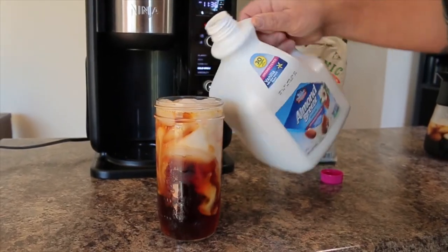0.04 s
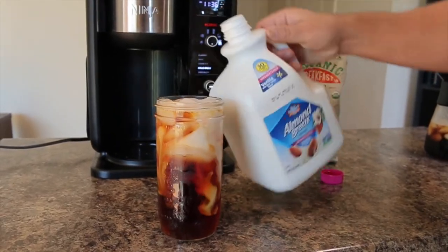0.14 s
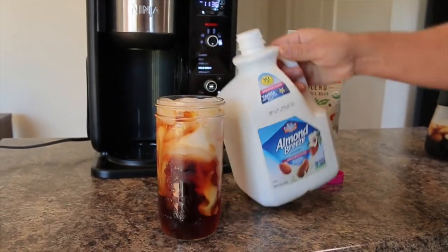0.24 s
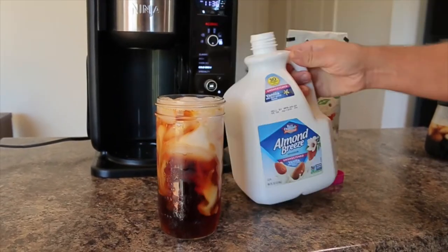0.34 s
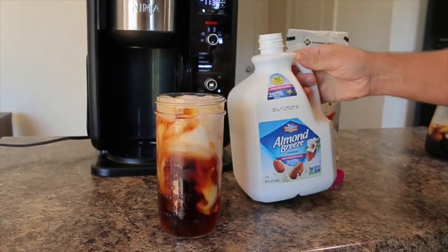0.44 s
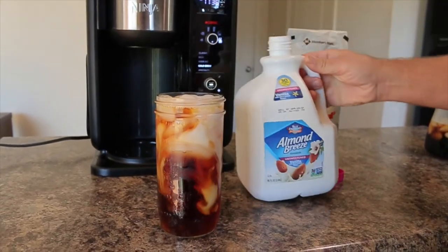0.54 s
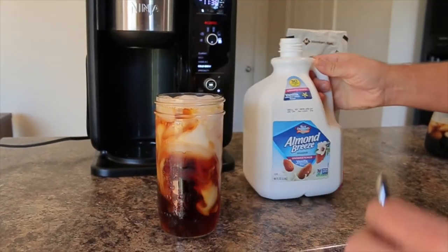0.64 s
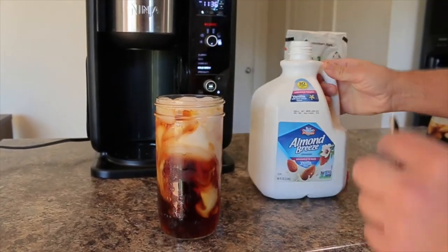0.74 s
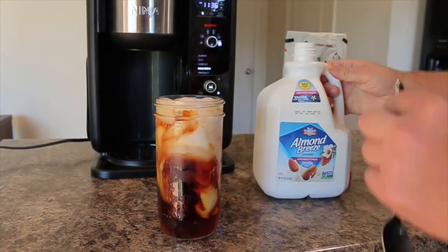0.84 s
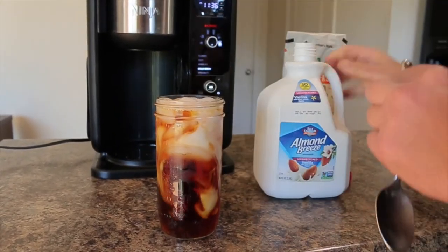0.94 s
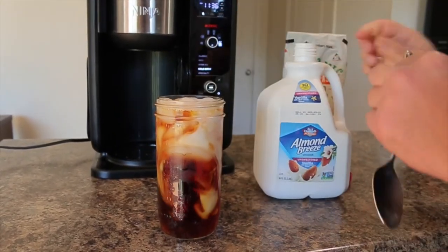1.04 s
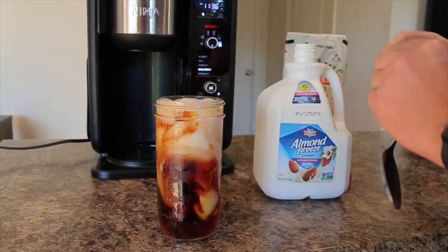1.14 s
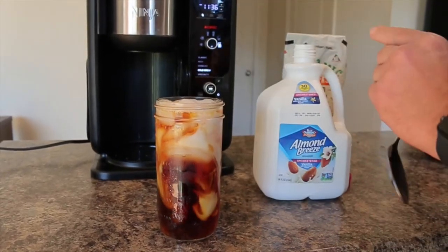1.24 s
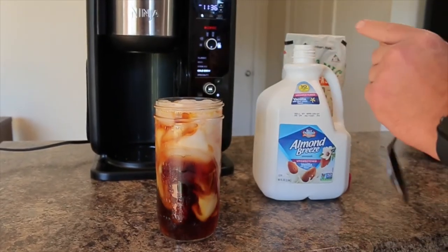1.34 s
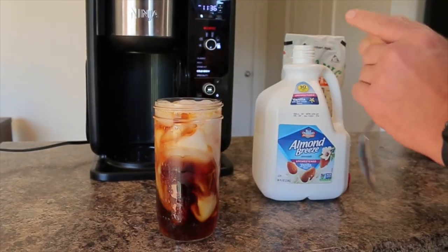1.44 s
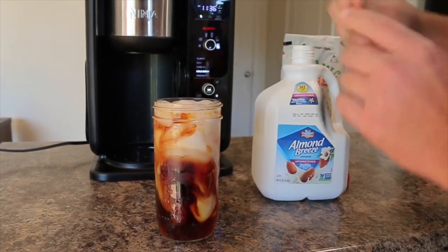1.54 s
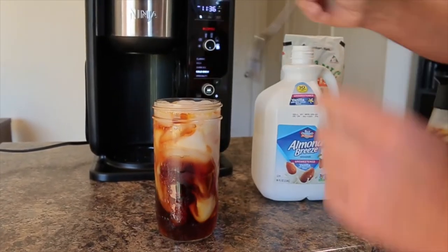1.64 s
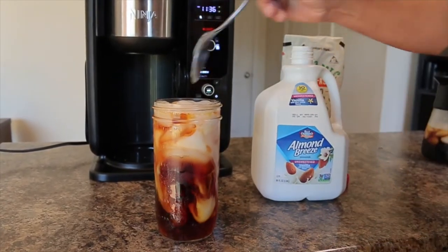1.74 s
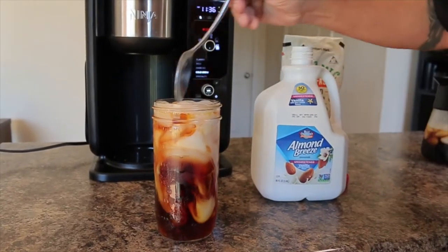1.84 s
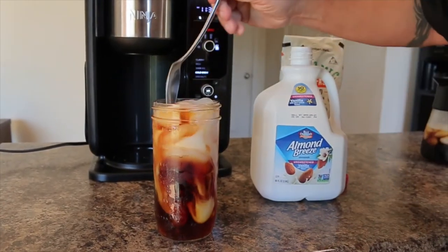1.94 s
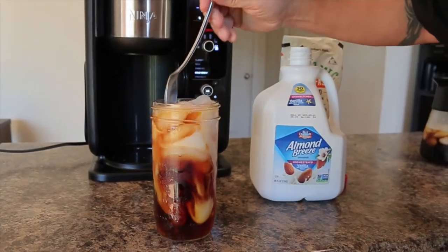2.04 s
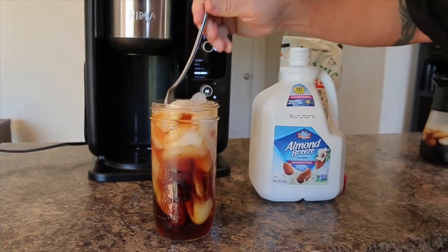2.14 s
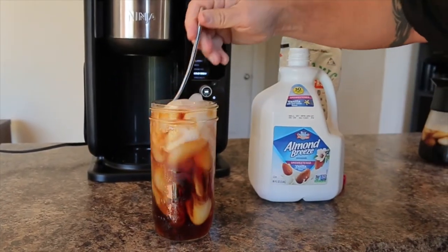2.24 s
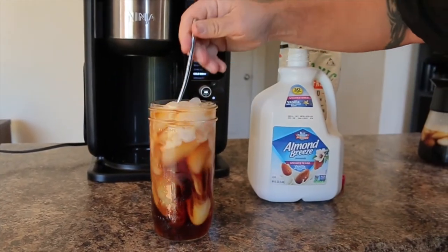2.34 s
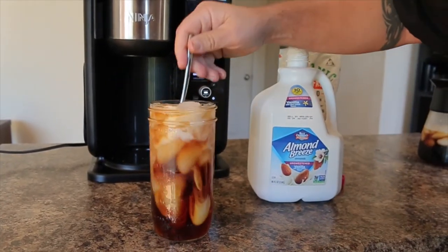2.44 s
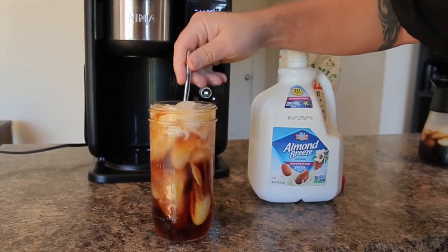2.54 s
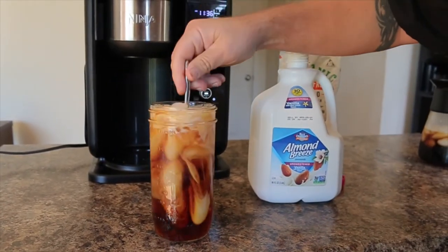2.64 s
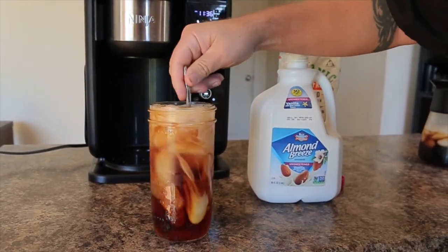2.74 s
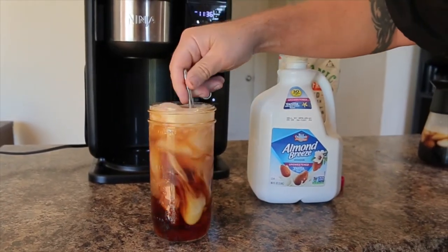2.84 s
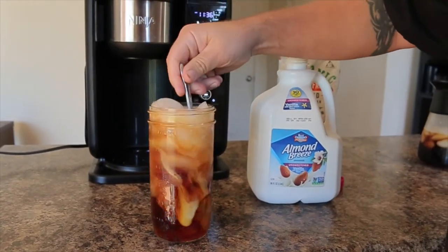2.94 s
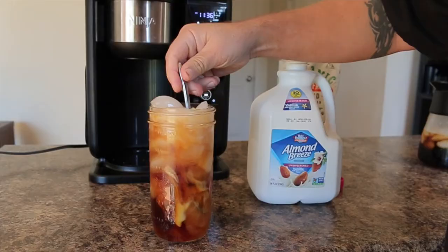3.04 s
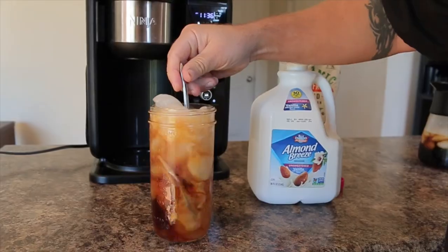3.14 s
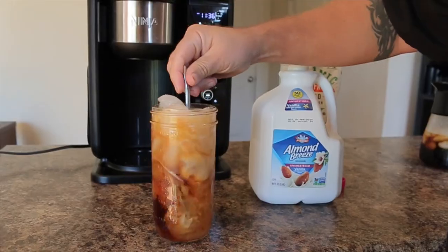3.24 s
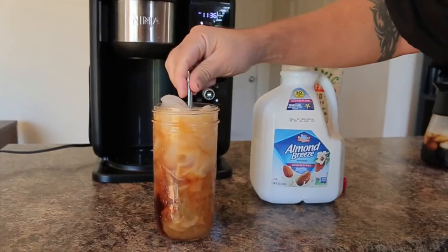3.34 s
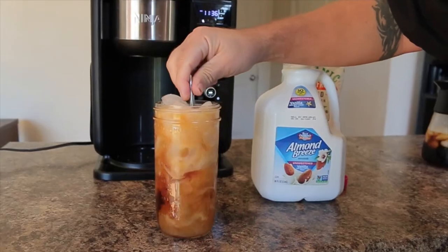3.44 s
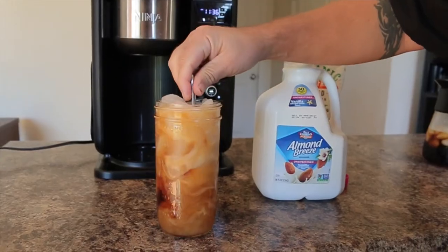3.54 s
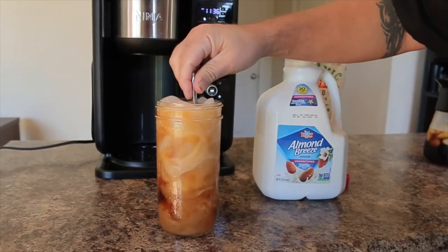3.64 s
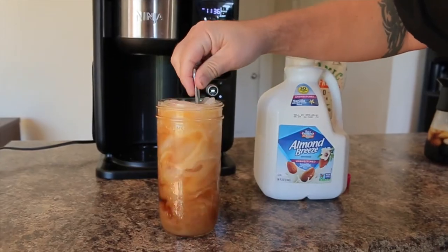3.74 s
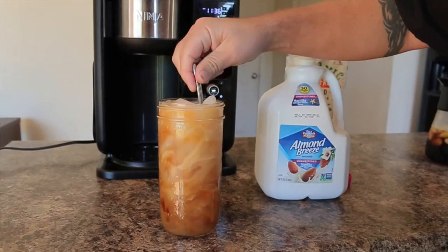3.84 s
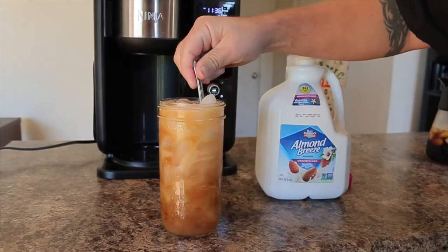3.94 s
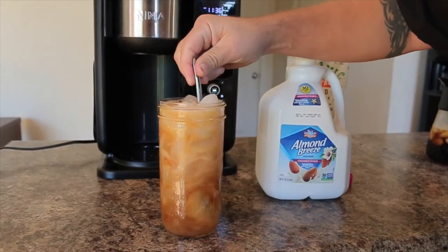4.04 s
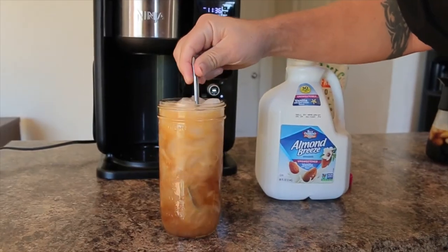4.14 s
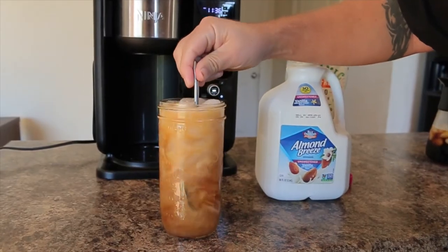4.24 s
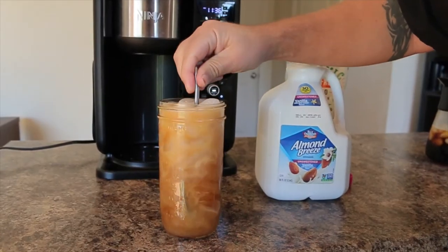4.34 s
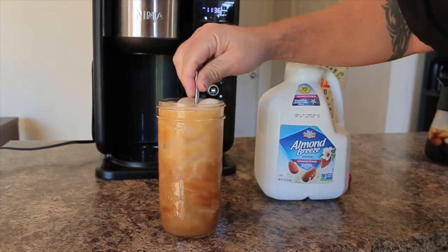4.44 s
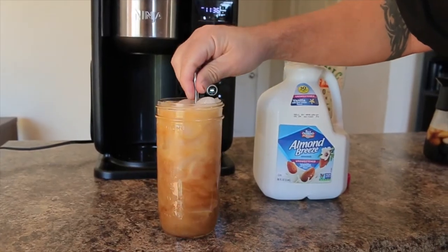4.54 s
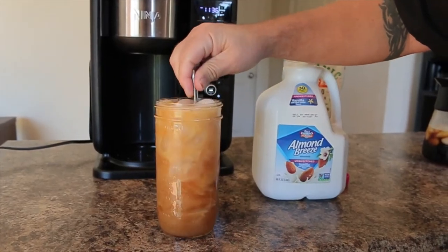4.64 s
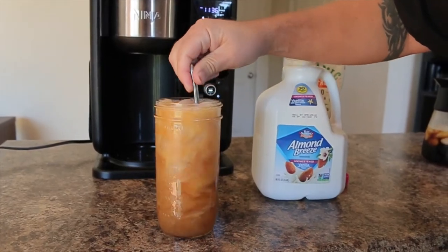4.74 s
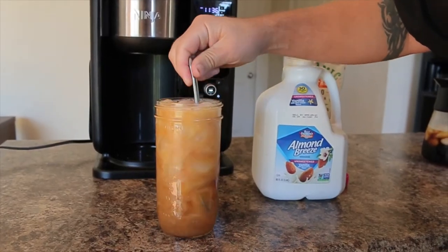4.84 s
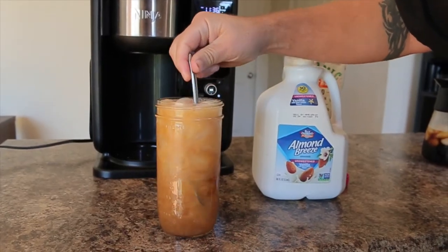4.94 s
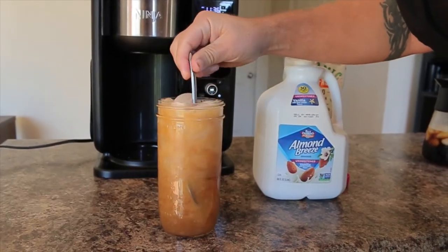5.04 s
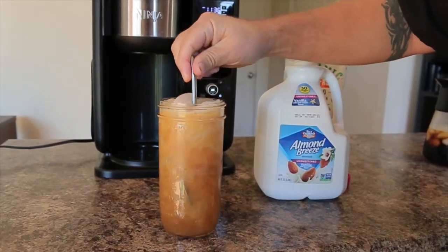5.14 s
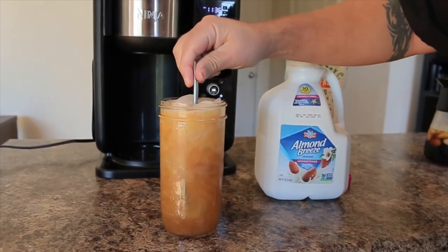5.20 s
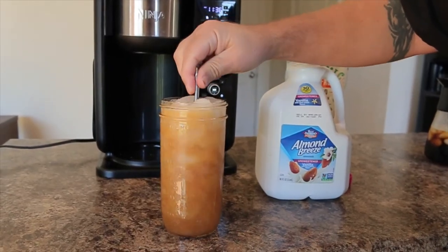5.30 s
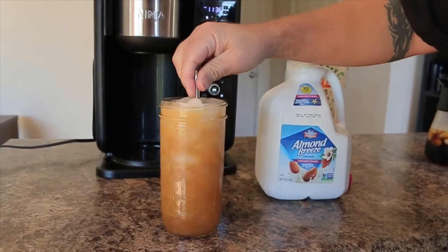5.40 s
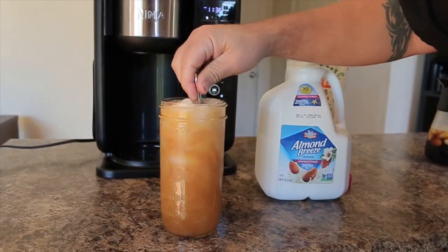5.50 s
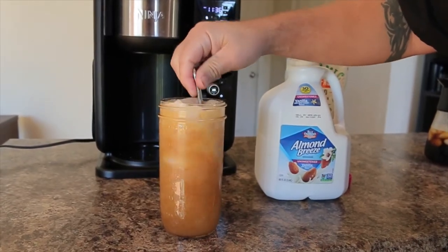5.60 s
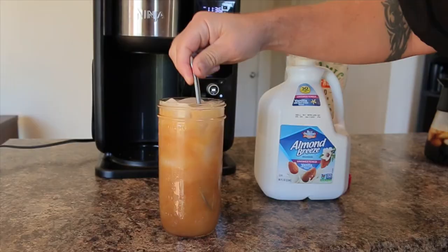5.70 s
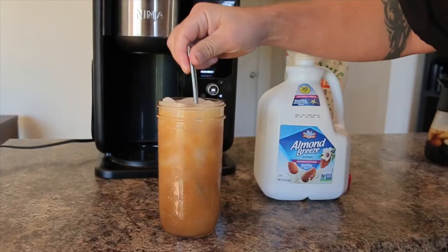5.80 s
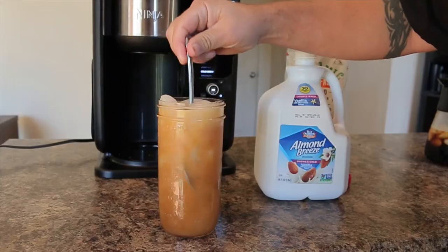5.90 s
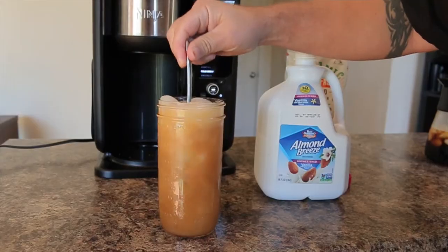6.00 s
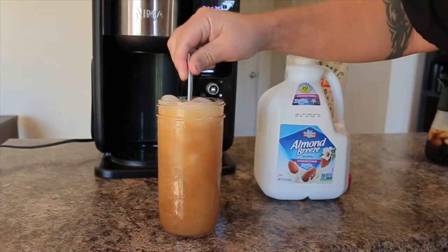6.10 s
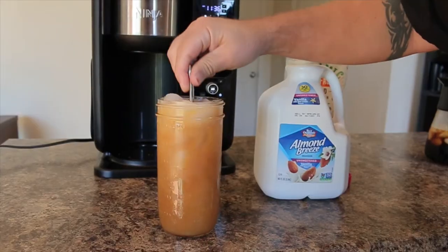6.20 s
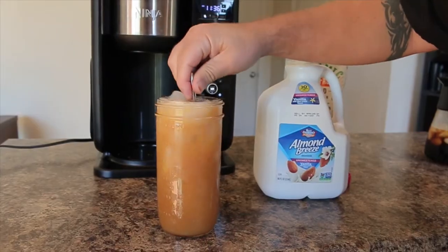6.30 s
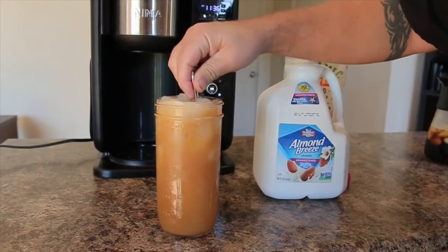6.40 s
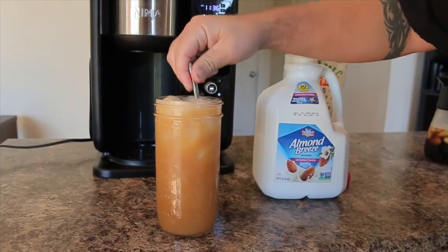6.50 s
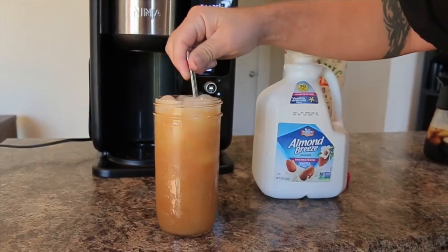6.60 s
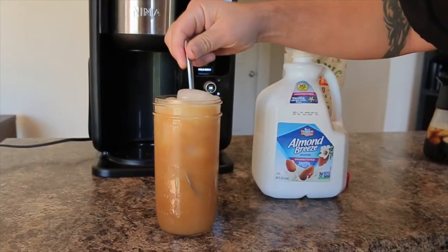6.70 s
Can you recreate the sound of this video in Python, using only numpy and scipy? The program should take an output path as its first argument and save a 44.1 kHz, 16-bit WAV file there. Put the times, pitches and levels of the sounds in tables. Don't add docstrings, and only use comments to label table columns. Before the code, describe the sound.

A quiet, slightly reverberant kitchen, heard closely in stereo over soft low ventilation hum and faint hiss. At 0.33 s a full plastic jug lands with a blunt, low thud; a second knock follows at 0.53, then smaller bumps and gritty scrapes with a brief hollow hum until about 0.95. Near silence follows, with a barely audible metallic whisper around 1.6-1.8. At 1.89 a spoon clinks into a glass jar, tapping again at 1.95 and 2.14. Irregular stirring continues to the end: short, damped glassy ticks, ice clacks, wet sloshing, rubbing and dull base rumbles. A strong clink rings at 2.79, with lesser accents at 3.65, 4.15 and 4.87, a bright graze at 5.90 and the hardest clink at 6.36. A hollow object bumps farther away at 6.53 and 6.59, rolling briefly under final clinks near 6.7.

```python
import sys
import numpy as np
from scipy import signal
from scipy.fft import rfft, irfft, next_fast_len
from scipy.io import wavfile
from scipy.ndimage import map_coordinates

SR = 44100
rng = np.random.default_rng(int(sys.argv[2]) if len(sys.argv) > 2 else 0)


def waveform_to_disk(signal):
    frames = np.transpose(np.atleast_2d(signal))
    scaled = np.clip(frames, -1, 1) * 32767
    samples = np.round(scaled).astype(np.int16)
    wavfile.write(sys.argv[1], SR, samples)


def invert_db(level):
    return 10 ** (np.asarray(level, dtype=float) / 20)


N = 298116

# (time [s], peak [dB], main ring [Hz], upper modes [dB], sharp edge [dB])
SQUARE_BLOWS = [(1.8915, -31, 3150, -8.5, -30), (1.9525, -36.5, 2860, -4, -12),
                (2.138, -34.5, 2835, -7, -25.5), (2.1767, -48, 2920, -15, -3), (3.517, -57.5, 2800, 4, 0),
                (3.5449, -50.5, 2740, -5.5, -16), (3.599, -50.5, 2840, -5.5, -5),
                (2.7862, -20, 2658, -5.5, -21), (2.833, -25.5, 2683, -19, -24),
                (2.864, -33, 2766, -12.5, -23), (3.043, -43, 2860, 1, -6), (3.0587, -38, 2818, -22.5, -23),
                (3.645, -32, 2755, -11.5, -26.5), (4.8722, -30.5, 3010, 0, -2.5),
                (6.3612, -19, 2676, -10, -11), (6.4303, -34, 2670, -19, -26.5),
                (6.7098, -34.5, 2817, -15, -16), (6.7402, -35, 2666, 3.5, -9.5)]
# (time [s], peak [dB], main ring [Hz], upper
# modes [dB], sharp edge [dB])
GLANCING_BLOWS = [
    (2.305, -43.5, 2778, 1.5, -21.5),
    (3.218, -37, 2886, 1.5, -22),
    (4.147, -30.5, 2776, 2, -21.5),
    (5.9008, -26, 2799, -1.5, -11),
    (6.1754, -37.5, 2657, -3, -8),
]
# (time [s], peak [dB], main ring [Hz])
ICE_TAPS = [(2.0344, -50.5, 2860), (2.0872, -64, 2790), (2.515, -53.5, 2584), (2.5481, -44.5, 2815),
            (2.5721, -57.5, 2850), (2.6069, -52, 2790), (2.7045, -45.5, 2777), (2.7183, -40, 2740),
            (2.9522, -46, 2857), (3.0057, -45.5, 2690), (3.0994, -48, 2790), (3.1455, -53.5, 2784),
            (3.1703, -60.5, 2740), (3.266, -42.5, 2836), (3.3346, -60.5, 2780), (3.4142, -44.5, 2758),
            (3.457, -61.5, 2780), (3.7127, -65, 2850), (3.7312, -46, 2860), (3.7585, -50.5, 2720),
            (3.7781, -49.5, 2684), (3.839, -52, 2696), (3.9313, -54.5, 2630), (3.9444, -51, 2820),
            (4.0259, -54, 2740), (4.0826, -42.5, 2778), (4.2992, -50.5, 2806), (4.4112, -47.5, 2709),
            (4.4683, -49.5, 2690), (4.7055, -54.5, 2860), (4.7257, -50.5, 2795), (4.7463, -56.5, 2840),
            (4.7651, -50.5, 2834), (4.808, -56, 2680), (5.0618, -55, 2786), (5.0996, -55.5, 2790),
            (5.1369, -43.5, 2812), (5.1533, -44.5, 2785), (5.2456, -53, 2770), (5.2696, -50.5, 2734),
            (5.3488, -54, 2760), (5.3851, -51.5, 2775), (5.5383, -56.5, 2730), (5.6334, -46.5, 2750),
            (5.8044, -44, 2742), (5.8331, -48, 2720), (5.9976, -53, 2810), (6.0569, -51, 2840),
            (6.0901, -50.5, 2810), (6.2018, -42.5, 2686), (6.2235, -44, 2720), (6.5928, -43.5, 2800),
            (4.8482, -46, 2800),
    (6.308, -50, 2780),
    (6.349, -44, 2773),
]
# (time [s], peak [dB], belly modes [dB])
ICE_CLACKS = [(2.1032, -62, 13), (2.208, -51, -6), (2.2816, -52, 2), (2.302, -46, -0.5), (2.316, -46, -1),
              (2.381, -51, -4), (2.388, -46.5, -18), (2.4164, -46, -2), (2.426, -50.5, 8),
              (2.934, -40.5, -13.5), (3.306, -59.5, 10.5), (3.469, -55, -4.5), (3.9588, -48.5, 3),
              (4.242, -50, 0), (4.5524, -51, 5.5), (4.598, -48.5, -1.5), (4.9552, -43.5, -6.5),
              (4.996, -46.5, -4), (5.489, -55.5, 5), (5.507, -57.5, 9), (5.5498, -46.5, 2.5),
              (5.607, -47.5, -17.5), (5.714, -62, 4), (5.752, -52, 8), (5.7619, -43.5, -14),
              (5.779, -47.5, 1.5), (5.8664, -50.5, -11.5), (5.9773, -47, -16), (6.3215, -48, -4.5),
              (6.4852, -50, -4), (6.6922, -52, 4)]
# (frequency [Hz], level [dB], t60 [s])
MAIN_MODES = [(2850, -15, .12), (2730, -17, .08), (2700, -6, .016), (2960, -12, .012), (2480, -12, .01)]
# (frequency [Hz], level [dB], t60 [s])
UPPER_MODES = [(3280, -6, .035), (3810, 0, .012), (4300, -1, .008), (5050, -3, .012)]
# (frequency [Hz], level [dB], t60 [s])
BELLY_MODES = [(1201.1, -4, 0.0673), (1045, -1.5, 0.0236), (1622, -11, 0.056), (2257, -4.5, 0.0174)]
# (frequency [Hz], level [dB per Hz])
ICE_CLATTER = [(200, -120), (500, -12), (1000, 0), (2200, -3.5), (4500, -9.5), (7000, -22), (12000, -120)]
# (frequency [Hz], level [dB per Hz])
SHORT_GLASS = [(1500, -120), (2400, 5), (3800, 4.5), (5500, -8.5), (9000, -14), (16000, -25), (16500, -120)]
# (frequency [Hz], level [dB per Hz])
CONTACT_CRACK = [(2000, -120), (4500, -23.5), (6000, 11), (9000, 1.5), (12000, -6), (16500, -15)]
# (time [s], peak [dB], frequency [Hz], t60 [s])
LASTING_PARTIALS = [(2.139, -48, 3900, .071), (2.139, -45, 3728, 0.082), (2.388, -52, 3600, 0.084),
                    (2.786, -57, 5073, 0.52), (2.801, -34.5, 2590, 0.0183), (2.786, -49.5, 6470, 0.093),
                    (2.785, -48, 1185, 0.276), (4.147, -52, 1186, 0.272), (4.872, -38.5, 3295, 0.075),
                    (4.872, -43, 2386, 0.052), (4.872, -51, 5490, 0.3), (4.872, -46.5, 1030, .05),
                    (4.873, -49, 1176, .3), (4.872, -40.5, 6400, 0.0284), (4.871, -46.5, 2800, .2),
                    (4.871, -50, 3990, .1), (5.91, -51, 4980, 0.3), (5.899, -52.5, 3900, .07),
                    (5.903, -34, 2720, 0.0198), (5.715, -51.5, 1197, 0.36), (5.605, -55.5, 3860, .06),
                    (6.088, -56, 3890, 0.0274), (2.508, -56, 3800, 0.0204), (5.128, -58, 4004, 0.031),
                    (6.169, -40.5, 2640, 0.0219), (6.172, -51, 1653, 0.0622), (6.361, -50, 3280, 0.063),
                    (6.361, -47, 3880, 0.066), (6.361, -48, 2124, 0.0196), (6.361, -50.5, 7160, .073),
                    (6.361, -52.5, 5104, 0.18), (6.741, -46.5, 4320, 0.039)]
# (time [s], peak [dB], frequency [Hz], t60 [s])
LONE_MODES = [(.535, -34, 160, .08), (.534, -52, 3000, .03), (.534, -55, 4200, .03),
              (1.893, -48, 2800, .15), (1.955, -47, 2800, .14), (2.141, -45, 2790, .13),
              (2.788, -49, 1190, .6), (2.867, -41, 2800, .05), (2.88, -45, 2790, .25),
              (.561, -38, 290, .06), (2.3, -50, 175, .25), (2.39, -51, 175, .2), (2.853, -55, 5150, .12),
              (4.147, -50, 5100, .1), (4.146, -40, 4200, .012), (.735, -50, 2100, .04),
              (.735, -50, 2600, .04), (.735, -46, 620, .06), (.83, -52, 2700, .03), (1.891, -60, 7980, .12),
              (2.035, -52, 3500, .03), (2.139, -43, 3600, .04), (2.139, -46, 1950, .05),
              (2.139, -53, 350, .1), (2.786, -39, 1100, .015), (2.786, -36, 4300, .012),
              (3.218, -44, 4300, .025), (3.517, -59, 5200, .02), (3.6005, -48, 900, .02),
              (3.612, -46, 200, .1), (3.618, -48, 430, .07), (3.6455, -48, 4500, .02),
              (3.65, -43, 140, .15), (3.655, -45, 210, .2), (3.729, -59, 5300, .02), (3.788, -48, 150, .09),
              (3.79, -50, 400, .06), (3.965, -59, 6500, .015), (4.082, -54, 2790, .02),
              (5.8974, -32, 4400, .008), (5.8974, -38, 5400, .008), (5.8974, -44, 9000, .006),
              (6.3612, -36, 2150, .02), (6.3612, -40, 1300, .015), (6.388, -50, 1250, .15),
              (6.43, -42, 2200, .015)]
# (time [s], rubbing [dB], slosh above rubbing [dB])
SPOON_PULLS = [(1.96, -57, 0), (2.13, -61, 0.5), (2.33, -60, 4), (2.5, -72, 12), (2.92, -57, 1.5),
               (3.09, -63, 6), (3.22, -66, 0), (3.68, -66, 5), (3.99, -68, 10), (4.13, -68, -5),
               (4.61, -65.5, 3.5), (5.06, -63.5, 3.5), (5.57, -64, 3), (5.75, -64, 8.5), (5.99, -64.5, -9),
               (6.39, -61, 5), (6.61, -65, 12.5), (6.76, -50.5, -12)]
# (frequency [Hz], width [Hz], level [dB])
RUBBED_WALL = [(2720, 267, -0.5), (2830, 150, 2), (3280, 73, -20), (3800, 254, -14)]
# (frequency [Hz], width [Hz], level [dB])
LIQUID = [(1214, 311, 3.5), (716, 360, 2), (1600, 450, -3)]
# (frequency [Hz], level [dB per Hz])
ICE_RATTLE = [(300, -120), (600, 23), (1500, 7.5), (2300, 8), (3800, 7.5), (5500, 6.5), (8000, -8),
              (14000, -59)]
# (time [s], rumble [dB])
JAR_ROCKS = [(1.9, -54.5), (1.99, -47), (2.15, -46.5), (2.311, -50.5), (2.45, -53), (2.6, -61),
             (2.82, -56.5), (3.03, -55.5), (3.12, -55), (3.22, -53.5), (3.665, -58), (3.98, -57),
             (4.2, -55), (4.61, -52.5), (4.9, -57.5), (5.1, -54), (5.2, -60.5), (5.34, -62.5),
             (5.575, -48.5), (5.79, -50), (6.22, -56), (6.38, -50.5), (6.61, -47.5)]
# (frequency [Hz], level [dB per Hz])
BASE_RUMBLE = [(40, -41.5), (70, -3), (110, 3), (190, -2), (300, -13), (450, -2), (900, -76), (2000, -120)]
# time [s], level [dB], rise [s], fall [s]
TUMBLE = (6.735, -60, .035, .05)
# (time [s], level [dB])
FINGER_TURNS = [
    (1.6, -71.5),
    (1.7, -71),
    (1.8, -76.5),
]
# (frequency [Hz], width [Hz], level [dB])
SPOON_HANDLE = [(1956, 124, -3.5), (2320, 90, 0.5), (2860, 92, -7.5), (3674, 220, -4)]
# (time [s], peak [dB], bright part [dB], strongest mode [Hz])
COUNTER_BLOWS = [(0.333, -22.5, -15.5, 163.1), (.359, -34.5, -9, 188.4), (.373, -40.5, -4.5, 200),
                 (0.533, -34, -6, 166), (.559, -44, -10.5, 175.6), (.61, -51.5, 5, 173),
                 (0.736, -42.5, 4, 174.5), (0.784, -42, -23.5, 176.2), (0.831, -45, 4, 175.7),
                 (0.897, -46.5, 3.5, 191), (1.89, -39.5, 4, 355), (1.951, -39, -6, 178),
                 (2.139, -42, 7, 350.6), (2.785, -41, -1.5, 355), (3.602, -41.5, -3.5, 351.4),
                 (3.646, -36.5, -17, 347.8), (4.874, -44, -22.5, 350.7), (5.551, -43, -4.5, 197),
                 (5.567, -37.5, -17.5, 197), (5.63, -48.5, -11, 200), (5.79, -46.5, 3, 110),
                 (3.1, -48.5, -15, 138.6), (6.33, -44.5, -9.5, 340.3), (6.372, -39, -1, 177.4)]
# (frequency [Hz], level [dB], t60 [s])
COUNTER_MODES = [(96.23, -6, 0.1554), (135.2, -6.5, 0.057), (197, -7.5, 0.1), (296.66, -7, 0.1563),
                 (355, -16, 0.122), (436.4, -9, 0.048), (521.9, -16, 0.083), (738.6, -9, 0.0423)]
# (frequency [Hz], level [dB per Hz])
BLUNT_PUFF = [(150, -120), (400, 8), (700, 6.5), (1500, -2), (2300, -6), (3500, -13.5), (7000, -25),
              (12000, -120)]
# (time [s], drum [dB], scrape [dB])
JUG_SHOVES = [
    (0.541, -44, -57.5),
    (.58, -40.5, -66.5),
    (.654, -44, -61.5),
    (0.749, -54, -51.5),
    (.79, -51, -53),
    (0.925, -50, -49),
]
# (frequency [Hz], level [dB per Hz])
JUG_SCRAPE = [(240, -24), (400, 8.5), (462, -9), (559, 5), (1370, -13.5), (1590, -11), (2650, -8.5),
              (7000, -29), (9100, -65.5), (15400, -120)]
# (time [s], peak [dB])
FAR_BUMPS = [
    (6.531, -30),
    (6.589, -37.5),
]
# (frequency [Hz], level [dB], t60 [s])
HOLLOW_MODES = [(441, -16, .07), (600, -8, .05), (680.7, -2, 0.047), (772, 3, 0.0423), (967, -4, 0.048),
                (1432, -17.5, 0.044), (2034, -16.5, 0.032)]
# (time [s], peak [dB], frequency [Hz], t60 [s])
HOLLOW_BOOMS = [
    (6.538, -38.5, 775, .12),
    (6.531, -44, 690, .07),
    (6.533, -48, 980, .2),
    (6.535, -49, 1443, .11),
    (6.533, -51, 1233, .15),
    (6.56, -47, 440, .2),
    (6.589, -49, 760, .12),
    (6.595, -48, 1010, .08),
    (6.67, -53, 770, .2),
]
# (time [s], level [dB])
FAR_ROLL = [
    (6.546, -51),
    (6.599, -54),
    (6.65, -54),
    (6.718, -53),
]
# (frequency [Hz], level [dB per Hz])
ROLL_SPECTRUM = [(200, -120), (330, -6), (480, -9), (750, 3), (1100, -9.5), (1600, -10.5), (2400, -23),
                 (5000, -120)]
# (frequency [Hz], t60 [s])
ROOM_DECAY = [(100, 0.482), (500, 0.373), (1500, 0.47), (4000, 0.262), (10000, 0.21)]
# (frequency [Hz], share [ratio])
ROOM_SIDE = [(100, 0.068), (300, 0.125), (1000, 0.315), (2500, 0.63), (5000, 1.33), (12000, 0.8)]
# (frequency [Hz], level [dB per Hz])
HUM_SPECTRUM = [(20, -14), (40, -30), (60, -5.5), (90, -14), (130, -8.5), (200, -9), (350, -5.5),
                (550, -13), (1100, -13.5), (1600, -16.5), (2300, -22), (3700, -23), (14300, -28.5),
                (16400, -36)]
# (frequency [Hz], width [Hz], level [dB])
DUCTS = [(355, 33.3, 4.5), (200, 35.3, 5), (663.8, 60, 4)]
# (frequency [Hz], correlation [ratio])
LIKENESS = [(30, 0.47), (100, 0.9), (300, 0.957), (1000, 0.796), (2500, 0.108), (5000, 0.024),
            (15000, 0.018)]

BELLY_DB, BELLY_GROWS, USUAL_BLOW_DB = -43, 0.414, -29
TAP_GAIN_DB, TAP_UPPER_DB, TAP_BELLY_DB, TAP_EDGE_DB = -2, -10, -5.5, -25.5
CLACK_UPPER_DB, CLACK_EDGE_DB = -3, -16
SQUARE, GLANCING, CUBE = 0, 1, 2
CUBE_RISE_S = .0012
CUBE_RING_HZ, CUBE_SCATTER_HZ, CUBE_SCATTER_DB = 2790, 50, 1
SPOON_RISE_CYCLES, SPOON_SPLIT_HZ = 6.8, 72.14
PING_RISE_CYCLES = .4
SPOON_IN_S, DRIFT_DB = 1.89, -79
SURGE_RISE_S, SURGE_FALL_S, RATTLE_UNDER_DB = 0.058, 0.123, -2
ROCK_RISE_S, ROCK_FALL_S = 0.0416, 0.0274
TURN_RISE_S, TURN_FALL_S = 0.071, 0.081
SCRAPE_RISE_S, SCRAPE_FALL_S = 0.0324, 0.0353
DRUM_RISE_S, DRUM_FALL_S = 0.0154, 0.076
JUG_HZ, JUG_WANDER_HZ = 175, 3.65
JUG_CHATTER_HZ = 23
WASH_RISE_S, WASH_FALL_S = 0.005, 0.032
HUM_DB = -56.5


def clinks():
    main, rest = np.zeros((2, N))
    for s, db, hz, upper_db, belly_db, edge_db, kind in contacts():
        lead, rise, t60 = {SQUARE: (0, .0003, .016), GLANCING: (.0015, .004, .026),
                           CUBE: (CUBE_RISE_S / 2, CUBE_RISE_S, .02)}[kind]
        start = s - lead
        struck = [(hz, 0, t60)] + MAIN_MODES
        add(main, start, invert_db(db - .3) * ring(struck, detune=.003, spread_db=2, attack=rise, rough=.6))
        add(rest, start, invert_db(db + upper_db + 1.0) * ring(UPPER_MODES, rough=0.51))
        add(rest, start, invert_db(db + belly_db) * ring(BELLY_MODES, attack=0.00069, rough=0.61))
        add(rest, start, invert_db(db + (upper_db + belly_db) / 2 - 2.5) * burst(ICE_CLATTER, t60=0.103))
        add(rest, start, invert_db(db + upper_db - 7.5) * burst(SHORT_GLASS, t60=0.0543))
        add(rest, start, invert_db(db + edge_db + 1.5) * burst(CONTACT_CRACK, t60=.008))
    for s, db, hz, t60 in LASTING_PARTIALS:
        split = [(hz + SPOON_SPLIT_HZ * side, -3 * abs(side), t60) for side in (-1, 0, 1.4)]
        partial = ring(split, detune=0, spread_db=0, attack=SPOON_RISE_CYCLES / hz, rough=1.1)
        add(rest, s, invert_db(db + 1) * partial)
    return main, rest + pings(LONE_MODES)


def contacts():
    rows = []
    for kind, table in [(SQUARE, SQUARE_BLOWS), (GLANCING, GLANCING_BLOWS)]:
        for s, db, hz, upper, edge in table:
            belly = BELLY_DB + BELLY_GROWS * (db - USUAL_BLOW_DB) - db
            rows.append((s, db, hz, upper, belly, edge, kind))
    cubes = [(s, db + TAP_GAIN_DB, hz, TAP_UPPER_DB, TAP_BELLY_DB, TAP_EDGE_DB)
             for s, db, hz in ICE_TAPS]
    cubes += [(s, db, CUBE_RING_HZ, CLACK_UPPER_DB, belly, CLACK_EDGE_DB) for s, db, belly in ICE_CLACKS]
    for s, db, hz, upper, belly, edge in cubes:
        a, b, c = rng.standard_normal(3)
        rows.append((s, db, hz + CUBE_SCATTER_HZ * a, upper + CUBE_SCATTER_DB * b, belly,
                     edge + CUBE_SCATTER_DB * c, CUBE))
    return rows


def stirring():
    s, db, wet_db = np.transpose(SPOON_PULLS)
    inside = np.arange(N) > SPOON_IN_S * SR
    wall = inside * (invert_db(DRIFT_DB) + swells(s, db, SURGE_RISE_S, SURGE_FALL_S))
    slosh = inside * (invert_db(DRIFT_DB) + swells(s, db + wet_db, SURGE_RISE_S, SURGE_FALL_S))
    rub = wall * invert_db(-4.0) * friction(380, 5.5, resonances(RUBBED_WALL))
    wet = slosh * invert_db(-2.5) * friction(900, 1.0, resonances(LIQUID))
    ice = wall * invert_db(RATTLE_UNDER_DB - 1.0) * friction(1200, 11.8, coloured(ICE_RATTLE))
    rocking = swells(*np.transpose(JAR_ROCKS), ROCK_RISE_S, ROCK_FALL_S)
    rock = rocking * friction(400, 4.55, coloured(BASE_RUMBLE))
    s, db, rise, fall = TUMBLE
    tumble = swells([s], [db], rise, fall) * friction(3000, 3.8, coloured(CONTACT_CRACK))
    return rub + wet + ice + rock + tumble + fingers()


def fingers():
    turning = swells(*np.transpose(FINGER_TURNS), TURN_RISE_S, TURN_FALL_S)
    return turning * friction(2500, 2.1, resonances(SPOON_HANDLE))


def counter():
    out = np.zeros(N)
    for s, db, bright_db, hz in COUNTER_BLOWS:
        slab = ring(COUNTER_MODES + [(hz, 1.5, .09)], detune=0.01486, spread_db=1.0, attack=0.00439)
        add(out, s, invert_db(db + 0.61) * slab)
        add(out, s, invert_db(db + bright_db) * burst(BLUNT_PUFF, t60=0.11))
    s, _, db = np.transpose(JUG_SHOVES)
    scrape = swells(s, db, SCRAPE_RISE_S, SCRAPE_FALL_S)
    return out + scrape * invert_db(-2.0) * friction(1500, 2.65, coloured(JUG_SCRAPE))


def jug_side():
    chatter = 1 + np.sin(2 * np.pi * JUG_CHATTER_HZ * np.arange(N) / SR)
    hz = JUG_HZ + JUG_WANDER_HZ * wobble(7.76) * chatter
    phase = 2 * np.pi * np.cumsum(hz) / SR
    s, db, _ = np.transpose(JUG_SHOVES)
    return swells(s, db, DRUM_RISE_S, DRUM_FALL_S) * np.sqrt(2) * np.sin(phase)


def knock():
    rolling = swells(*np.transpose(FAR_ROLL), WASH_RISE_S, WASH_FALL_S)
    out = rolling * friction(350, 4.17, coloured(ROLL_SPECTRUM))
    for s, db in FAR_BUMPS:
        hollow = ring(HOLLOW_MODES, detune=0.005, spread_db=0.6, attack=0.003, rough=0.454)
        add(out, s, invert_db(db - 7.0) * hollow)
        add(out, s, invert_db(db - 13.5) * burst(BLUNT_PUFF, t60=0.098))
    return out + pings(HOLLOW_BOOMS)


def kitchen(x, piece=.3):
    out, step = np.zeros((2, N)), int(piece * SR)
    for start in range(0, N, step):
        hz, t, z = signal.stft(rng.standard_normal((2, int(.6 * SR))), SR, nperseg=256)
        z = z * invert_db(-60 * t / along(ROOM_DECAY, hz)[:, None])
        z[1] *= np.clip(along(ROOM_SIDE, hz), 0, 1.5)[:, None]
        mid, side = signal.istft(z, SR, nperseg=256)[1]
        late = 1 - np.exp(-np.arange(len(mid)) / (.007 * SR))
        tail = np.array([mid + side, mid - side]) * late / np.linalg.norm(mid)
        sound = np.pad(x[start:start + step], (200, 0))
        wet = signal.fftconvolve(sound[None], tail, axes=1)
        out[:, start:start + wet.shape[1]] += wet[:, :N - start]
    return out


def hum():
    def mid_side(hz):
        ducts = 1 + sum(np.abs(resonances([peak])(hz)) for peak in DUCTS)
        angle = np.arccos(np.clip(along(LIKENESS, hz), -1, 1)) / 2
        return ducts * invert_db(along(HUM_SPECTRUM, hz)) * [np.cos(angle), np.sin(angle)]
    mid, side = filtered(rng.standard_normal((2, N)), mid_side)
    return invert_db(HUM_DB + 0.09 * wobble(3.08)) * np.array([mid + side, mid - side]) / np.std(mid)


def ring(modes, detune=0.02544, spread_db=3, attack=0.0000746, rough=0):
    t = np.arange(int(SR * max(t60 for *_, t60 in modes))) / SR
    luck = rng.standard_normal((len(modes), 2))
    knots = rng.standard_normal((2, int(t[-1] * 130) + 2))
    swell, slip = [rough * np.interp(t * 130, np.arange(len(k)), k - k[0]) for k in knots]
    tones = np.zeros(len(t))
    for (hz, db, t60), (a, b) in zip(modes, luck):
        decay = invert_db(db + spread_db * a - 60 * t / t60)
        tones += decay * np.sin(2 * np.pi * hz * (1 + detune * b) * t + slip)
    tones = tones * (1 - np.exp(-t / attack))
    return tones / np.abs(tones).max() * invert_db(2 * swell)


def pings(table):
    out = np.zeros(N)
    for s, db, hz, t60 in table:
        t = np.arange(int(SR * t60)) / SR
        pair = np.sin(2 * np.pi * hz * t) + .3 * np.sin(2 * np.pi * hz * 1.03 * t)
        rise = 1 - np.exp(-t * hz / PING_RISE_CYCLES)
        add(out, s, invert_db(db - 60 * t / t60) * rise * pair)
    return out


def burst(spectrum, t60):
    t = np.arange(2 ** 12) / SR
    colour = invert_db(along(spectrum, np.fft.rfftfreq(len(t), 1 / SR)))
    noise = irfft(rfft(rng.standard_normal(len(t))) * colour, len(t))
    noise = noise * invert_db(-60 * t / t60) * (1 - np.exp(-t / 0.00025))
    return noise / np.abs(noise).max()


def grit(rate, size_db):
    size = np.minimum(rng.exponential(size=N), 2.5)
    hits = rng.random(N) < rate / SR
    return unit(hits * rng.choice([-1, 1], N) * invert_db(size_db * size))


def friction(rate, size_db, response):
    return unit(filtered(grit(rate, size_db), response))


def swells(times, levels_db, rise, fall):
    t, out = np.arange(N) / SR, np.full(N, -200.)
    for s, db in zip(times, levels_db):
        out = np.maximum(out, db - 20 / np.log(10) * np.maximum((s - t) / rise, (t - s) / fall))
    return invert_db(out)


def resonances(peaks):
    def response(f):
        total = 0
        for k, (centre, width, db) in enumerate(peaks):
            total = total + (-1) ** k * invert_db(db) * 1j * f * width / (centre ** 2 - f * f + 1j * f * width)
        return total
    return response


def coloured(spectrum):
    return lambda f: invert_db(along(spectrum, f))


def filtered(x, response):
    m = next_fast_len(N + SR // 2)
    return irfft(rfft(x, m) * response(np.fft.rfftfreq(m, 1 / SR)), m)[..., :N]


def along(points, hz):
    f, v = np.transpose(points)
    return np.interp(np.log(hz + 1), np.log(f + 1), v)


def wobble(rate):
    return map_coordinates(rng.standard_normal(int(N * rate / SR) + 4), [np.arange(N) * rate / SR])


def unit(x):
    return x / np.sqrt(np.mean(x ** 2) + 1e-20)


def add(track, s, sound):
    part = track[round(s * SR):][:len(sound)]
    part += sound[:len(part)]


def scene():
    main, rest = clinks()
    stir, slab, far = stirring(), counter(), knock()
    jar = main * invert_db([[-1.6], [1.6]]) + stir * invert_db([[-.8], [.8]]) + rest * invert_db([[-.3], [.3]])
    jar[0] = np.roll(jar[0], -1)
    stone = (slab + jug_side()) * invert_db([[.7], [-.7]])
    direct = jar + stone + np.array([np.roll(far, -2), far])
    to_room = invert_db(-10.5) * main + invert_db(-7.0) * rest + invert_db(-4.5) * stir + invert_db(-5.0) * slab + invert_db(-1.5) * far
    near = direct + kitchen(to_room)
    bass_cut = lambda f: (1j * f / (55 + 1j * f)) ** 3
    return filtered(near, bass_cut) + hum()


def top_cut(x):
    return signal.sosfilt(signal.butter(12, 15790, fs=SR, output="sos"), x)


def record(dry):
    mix = filtered(dry, lambda hz: hz < 15790)
    return top_cut(mix)


dry = scene()
out = record(dry)
waveform_to_disk(out)
```